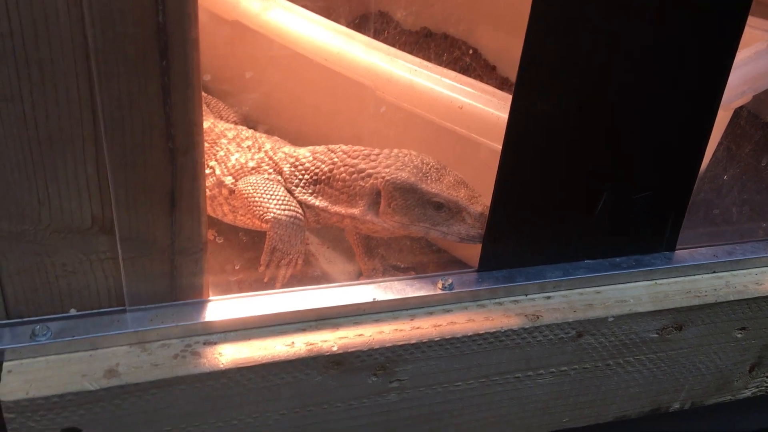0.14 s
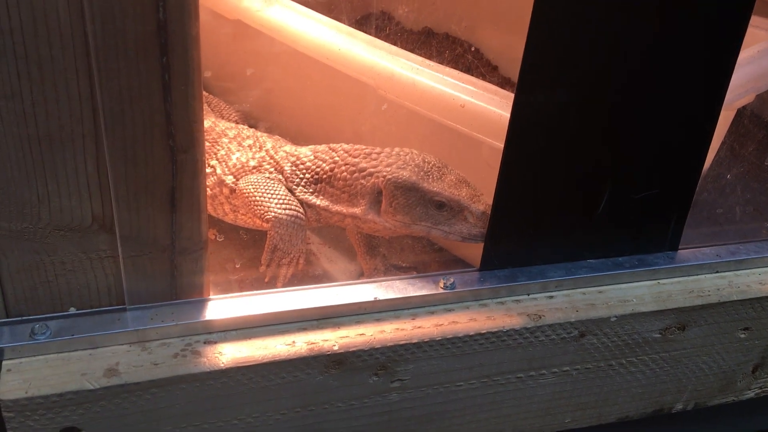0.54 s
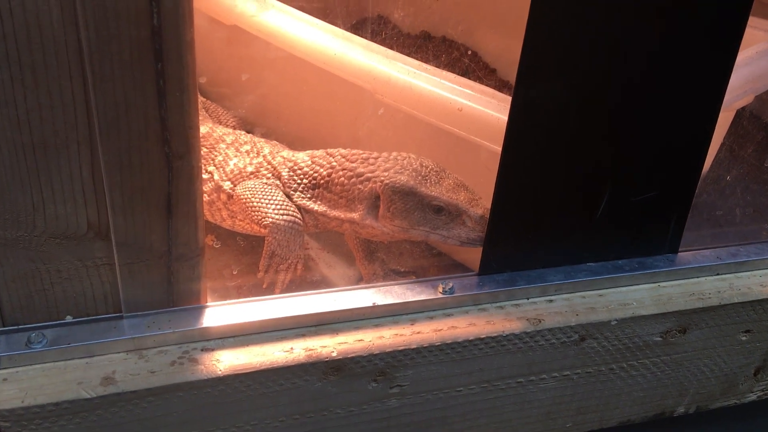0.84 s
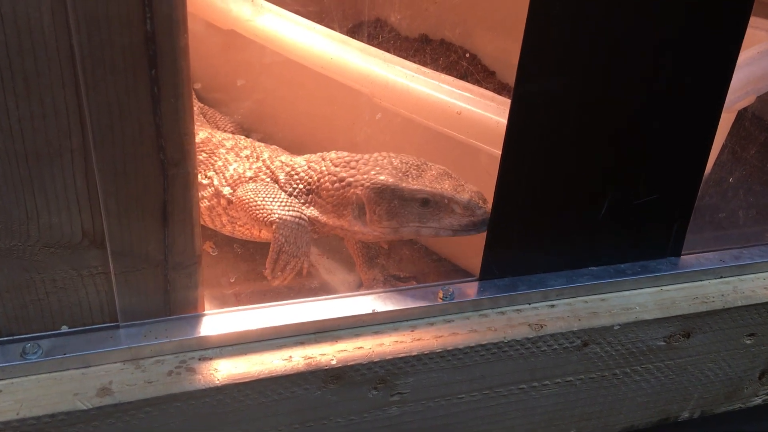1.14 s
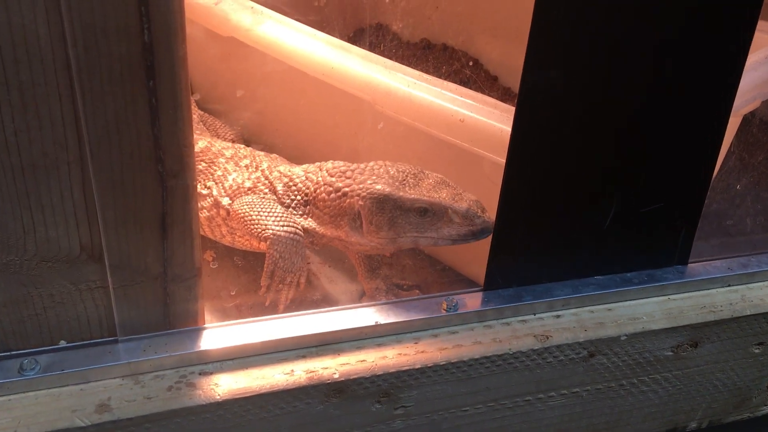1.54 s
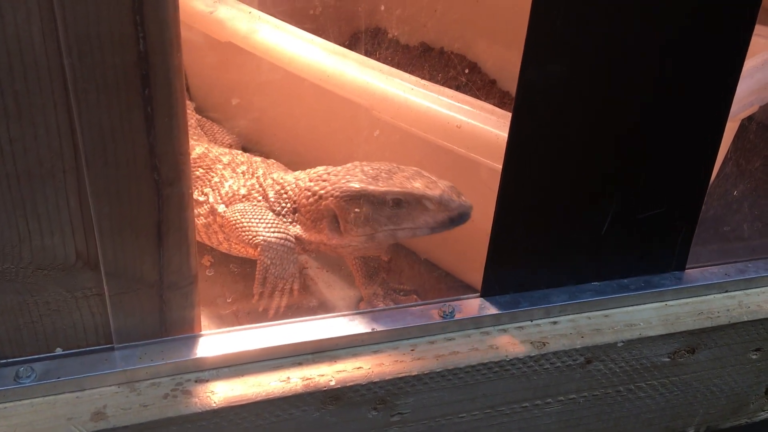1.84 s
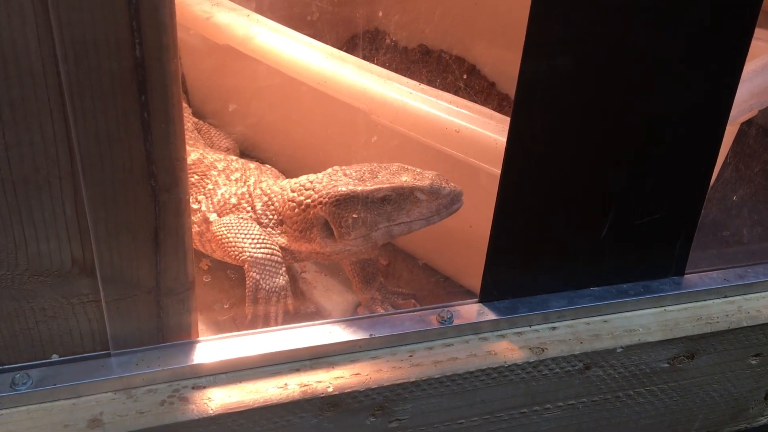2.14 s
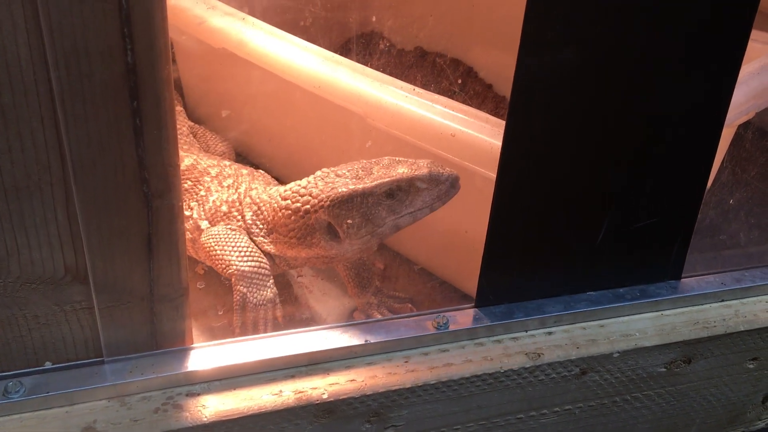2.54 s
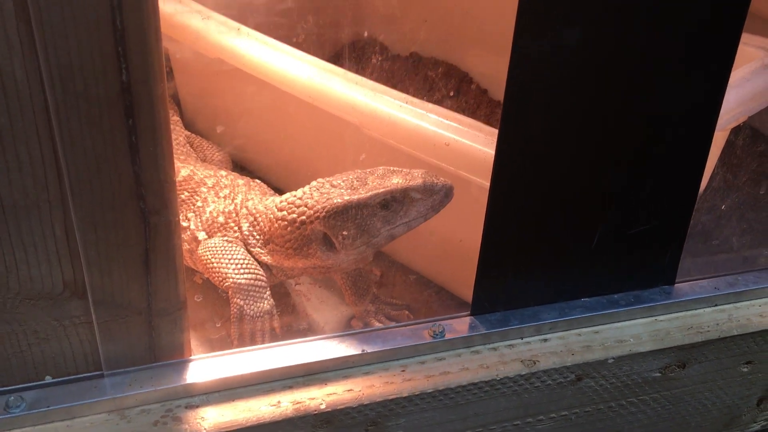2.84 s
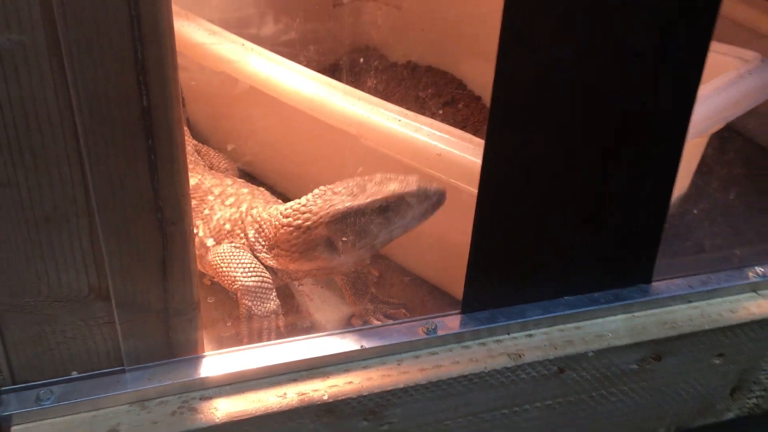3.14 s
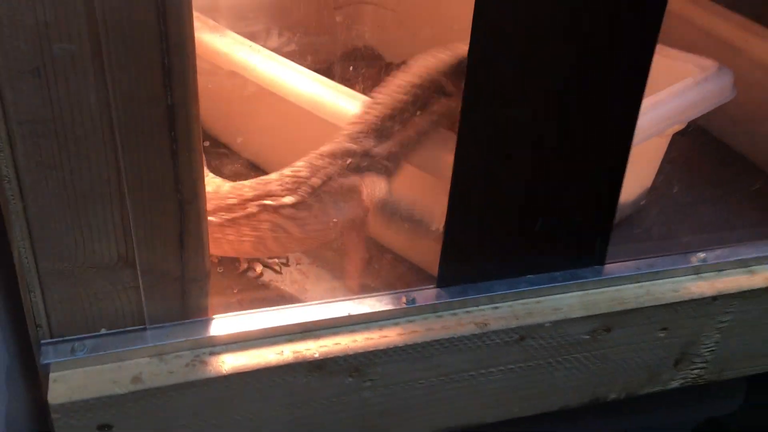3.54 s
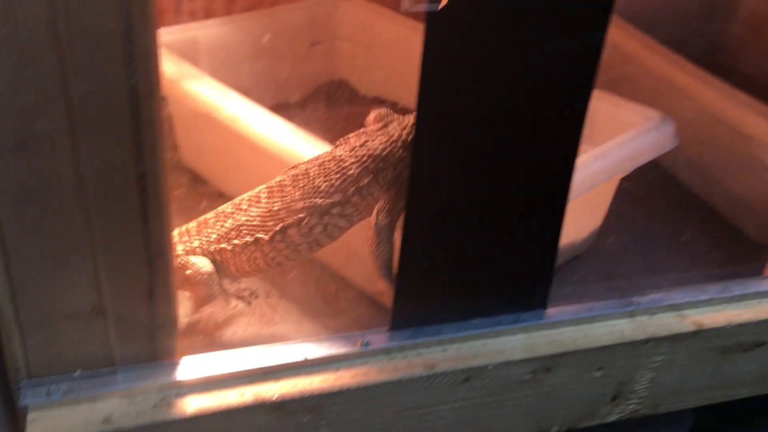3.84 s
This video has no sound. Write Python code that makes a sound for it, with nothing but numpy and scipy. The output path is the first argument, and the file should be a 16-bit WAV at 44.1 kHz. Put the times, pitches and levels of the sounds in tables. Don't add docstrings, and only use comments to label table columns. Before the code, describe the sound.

A gritty sliding scrape of glass in wood, with claw scrabbling and hard tub knocks, after a faint hiss

```python
import sys
import numpy as np
from scipy import signal
from scipy.fft import rfft, irfft
from scipy.io import wavfile
from scipy.ndimage import uniform_filter1d

SR = 44100
rng = np.random.default_rng(int(sys.argv[2]) if len(sys.argv) > 2 else 0)


def transcribe(u):
    v = np.clip(np.atleast_2d(u).T, -1, 1)
    q = np.round(v * 32767).astype(np.int16)
    wavfile.write(sys.argv[1], SR, q)


def how_loud(loudness_db):
    steps = np.asarray(loudness_db, float) / 20
    return 10 ** steps


N = 176400

# (frequency [Hz], density [dB per Hz])
ROOM_LOW = [(30, -11.5), (54, 5.5), (128, -3.5), (282, -13), (393, -11), (557, -21), (895, -16),
            (1200, -40)]
ROOM_HIGH = [(1100, -5), (2000, -12.5), (4300, -16.5), (4950, -21.5), (5500, -7.5), (7500, -20),
             (9500, -22), (15800, -28)]
# (frequency [Hz], level [dB rms])
MOTOR_TONES = [(59.1, -67), (129, -66.5), (177.4, -70.5), (236.6, -72), (473, -80), (708, -85.5),
               (1534, -76), (1593, -87), (1947, -81.5), (2005, -85.5)]
MOTOR_WHINE = [(3892, -93), (4247, -93), (4544, -93), (5776, -92), (6148, -91)]
# (frequency [Hz], width [Hz], level [dB])
AIR_BANDS = [(6150, 430, -1), (6460, 260, 16.5), (6800, 320, -34), (890, 98, 19.5)]

# (start [s], length [s], level [dB], pitch [Hz])
RUSTLES = [
    (0.022, 0.046, -62.5, 2900),
    (0.032, 0.11, -67, 2050),
    (0.331, 0.019, -69.5, 2710),
    (.7, 0.18, -77, 2900),
    (0.432, 0.11, -69, 2730),
    (0.569, 0.076, -72, 2800),
    (1.988, 0.027, -75, 2700),
]

# (time [s], crack level [dB], ring level [dB])
KNOCKS = [(.029, -46, -54), (.0385, -54, -52.5), (1.228, -62, -63), (1.247, -61, -69), (1.601, -57, -62),
          (1.613, -61, -72), (2.119, -57, -43), (3.6065, -25.5, -35.5), (3.63, -36, -36),
          (3.9071, -14.5, -15.5), (3.957, -26.5, -37), (3.9625, -36, -33)]
# (frequency [Hz], level [dB], t60 [s], swell [s])
TUB_MODES = [(1990, -12.5, 0.022, 0.0016), (1452, -8.5, 0.035, 0.0028), (1566, -11, 0.04, 0.0039),
             (1040, -8.5, 0.058, 0.0013), (872, -10.5, .09, 0.0035), (643, -14.5, 0.13, 0.0087),
             (567, 7, 0.027, 0.0039), (443, -10.5, 0.13, 0.005), (286.7, -10.5, 0.14, 0.015),
             (191, -11, 0.11, 0.021), (119.3, -7, 0.13, 0.045)]

# (time [s], level [dB])
BUMPS = [
    (0.032, -66),
    (.039, -53.5),
    (.047, -57.5),
    (0.063, -69),
    (.085, -68),
]
# (frequency [Hz], level [dB], t60 [s])
GLASS_MODES = [(606, -1, 0.11), (1550, -3, 0.062), (2140, -0.5, 0.041), (3180, -2.5, 0.087),
               (3750, -7, 0.058), (5550, -10, .04), (7100, -15, .03)]

# (time [s], peak level [dB], pitch [Hz], wide snap
# level [dB])
TICKS = [(.346, -64, 4500, -7), (.93, -49, 3100, -4), (.96, -57, 8500, -8), (1.228, -53, 6400, -4),
         (1.26, -66, 8500, -3), (2.116, -53, 3580, -6), (2.179, -54, 9500, -8), (3.226, -44, 9000, -2),
         (3.5412, -37, 4700, -16), (3.6062, -27, 3000, -14), (3.608, -30.5, 8500, 2),
         (3.6392, -32, 6950, 1), (3.676, -37, 6300, -14), (3.744, -38, 6500, -8), (3.853, -37.5, 6900, -14),
         (3.901, -35, 3600, -10), (3.907, -31, 4200, -20), (3.9068, -38.5, 8050, -12),
         (3.924, -44, 13000, 0), (3.927, -39.5, 5460, 7.5), (3.931, -37.5, 7000, 3),
         (3.957, -46, 8000, -10), (3.965, -47, 6000, -8)]

# (time [s], level [dB], share of narrow throat [0-1])
HISS = [
    (.68, -80, 0),
    (.76, -70.5, 0),
    (.9, -66, 0),
    (.93, -60.5, 0),
    (.955, -63, 0.2),
    (.984, -57.5, 0.5),
    (1.008, -65, 0),
    (1.022, -77, .3),
]
# (frequency [Hz], density [dB per Hz])
HISS_AIR = [(1500, -1.5), (2500, -1.5), (6300, -5.5), (9200, -8.5), (15800, -17)]
# (frequency [Hz], width [Hz], level [dB])
THROAT = [(2600, 160, -1), (4200, 120, 0), (5670, 150, -3), (8000, 300, -8)]

# (time [s], pressure [dB], fizz level [dB], rumble level [dB])
PUSHES = [
    [(2.116, -53, -6, -7), (2.126, -52.5, -9.5, 7), (2.155, -59.5, -7, 5.5), (2.195, -55, -3, 4.5),
     (2.215, -44, -7.5, -1.5), (2.25, -49.5, -11, -1.5), (2.305, -57, -5.5, 6.5), (2.345, -52, -4, -2.5),
     (2.45, -54, 0.5, -8.5)],
    [(2.45, -56.5, 1.5, -5), (2.55, -44.5, -10.5, -12), (2.62, -41, -9, -14), (2.664, -44, -6.5, -12.5),
     (2.788, -36, -21, -8), (2.87, -41.5, -8, -6), (2.97, -38, -11, -12.5), (3.036, -44.5, -4.5, -3),
     (3.065, -52, 0, -9)],
    [(3.065, -50.5, 2.5, -15), (3.1, -39, -13, -7), (3.15, -38.5, -11.5, -12), (3.178, -40, -8, -12),
     (3.2, -39.5, -15, -2.5), (3.27, -44.5, -11, 1), (3.35, -51, -7.5, 2), (3.4, -54.5, -5.5, 6.5)],
    [(3.4, -52, -5, 3.5), (3.53, -43, -9, 0.5), (3.6, -40.5, -11.5, -5.5), (3.635, -40.5, -1.5, -1),
     (3.68, -39, -11.5, -11.5), (3.75, -44, -6.5, -6.5), (3.85, -40.5, -11.5, -4), (3.93, -49.5, -6, 1.5),
     (4.01, -57.5, -14, 21)],
]
# (frequency [Hz], density [dB per Hz])
SCRAPES = [
    [(400, -7.5), (1000, -10.5), (1700, -6), (2700, -16), (4500, -45)],
    [(400, -6.5), (900, -1.5), (1500, -4.5), (2900, -9.5), (4500, -27)],
]
# (frequency [Hz], width [Hz], level [dB])
PANES = [
    [(732, 19, -10), (985, 64, -1), (1490, 25, 0.5), (1760, 53, -7), (2216, 11, -11), (2520, 32, -3.5),
     (3210, 19, -30), (3210, 85, -13), (3640, 44, -17)],
    [(587, 19, -2.5), (745, 22, 0), (990, 100, 1), (1230, 13, -15), (1436, 50, -2), (1800, 37, 1.5),
     (2500, 65, -7), (3230, 58, -16), (3530, 170, -16)],
    [(430, 19, -8), (660, 83, 3), (1270, 93, 10), (2060, 50, -12), (2760, 70, -6), (3100, 80, -12),
     (3730, 40, -9)],
]
PANE_RING_DB = [-6, -1.5, -3, -5]
# (frequency [Hz], density [dB per Hz])
FIZZ = [(3500, -0.5), (5000, -6), (6200, -1), (7800, -11.5), (9300, -4.5), (10500, -15), (11500, -12),
        (15800, -19)]
RUMBLE = [(30, -46), (64, 6), (102, -11.5), (226, -3.5), (407, -6.5), (600, -13.5)]

# (time [s], level [dB], pitch [Hz], t60 [s])
THUDS = [
    (2.125, -40, 66, .35),
    (2.205, -41, 156, 0.23),
    (2.27, -49, 150, .2),
    (2.52, -49, 85, .4),
    (3.77, -41, 130, 0.27),
    (3.965, -42, 70, .3),
]


def evened(x):
    return x / np.sqrt(np.mean(x ** 2) + 1e-20)


def read(points, hz):
    f, value = np.transpose(points)
    return np.interp(np.log(hz + 1), np.log(f + 1), value)


def colour(x, points):
    hz = np.fft.rfftfreq(len(x), 1 / SR)
    below = np.maximum(np.log2(points[0][0] / (hz + 1)), 0)
    above = np.maximum(np.log2((hz + 1) / points[-1][0]), 0)
    gain = how_loud(read(points, hz) - 24 * (below + above))
    return evened(irfft(rfft(x) * gain, len(x)))


def add(mix, s, sound):
    part = mix[round(s * SR):][:len(sound)]
    part += sound[:len(part)]


def ring(x, peaks):
    total = np.zeros(len(x))
    for hz, width, db in peaks:
        b, a = signal.iirpeak(hz, hz / max(width, 5), SR)
        total += how_loud(db) * signal.lfilter(b, a, x)
    return evened(total)


def drift(per_s):
    knots = rng.standard_normal(int(N / SR * 400) + 2)
    knots = uniform_filter1d(knots, max(int(400 / per_s), 1))
    knots = evened(uniform_filter1d(knots, max(int(200 / per_s), 1)))
    return np.interp(np.arange(N), np.linspace(0, N, len(knots)), knots)


def grit(per_s, spread_db, patchy_db):
    size_db = spread_db * np.minimum(rng.exponential(1, N), 5)
    struck = rng.random(N) < per_s / SR
    z = signal.stft(rng.standard_normal(N) * how_loud(size_db) * struck, nperseg=512)[2]
    patches = uniform_filter1d(rng.standard_normal(z.shape), size=5, axis=0)
    patches = evened(uniform_filter1d(patches, size=8, axis=1))
    return evened(signal.istft(z * how_loud(patchy_db * patches), nperseg=512)[1][:N])


def follow(rows, column):
    rows, t = np.array(rows), np.arange(N) / SR
    fade_s = 0.0042
    inside_s = np.minimum(t - rows[0, 0], rows[-1, 0] - t)
    gate = np.clip(inside_s / (2 * fade_s) + .5, 0, 1)
    return np.interp(t, rows[:, 0], rows[:, column]), np.sqrt(gate)


def sway(x, peaks):
    out = np.zeros(len(x))
    for hz, width, db in peaks:
        bent_hz = hz * (1 + .028 * drift(4.))
        turn = np.exp(2j * np.pi * np.cumsum(bent_hz) / SR)
        r = np.exp(-np.pi * max(width, 40) / SR)
        band = turn * signal.lfilter([1 - r], [1, -r], x / turn)
        out += how_loud(db + 2. * drift(12.0)) * evened(band.real)
    return evened(out)


def room():
    t = np.arange(N) / SR
    low_db = -58.5 + drift(2.9)
    air = how_loud(low_db) * colour(rng.standard_normal(N), ROOM_LOW)
    air += how_loud(-71.5) * colour(grit(20000, .5, 1.), ROOM_HIGH)
    air += how_loud(-80) * ring(rng.standard_normal(N), AIR_BANDS)
    for hz, db in MOTOR_TONES + MOTOR_WHINE:
        waver_db = 3.5 if hz < 300 else 1.
        phase = 2 * np.pi * (hz * t + rng.random()) + 0.046 * drift(2.9)
        air += np.sqrt(2) * how_loud(db + waver_db * drift(22)) * np.sin(phase)
    return air


def rustles():
    out, grains = np.zeros(N), grit(7000, 2., 2.)
    for start, length, db, hz in RUSTLES:
        t = np.arange(0, length, 1 / SR)
        piece = grains[round(start * SR):][:len(t)]
        broad = ring(piece, [(1.4 * hz, 1.8 * hz, 0)])
        brush = ring(broad, [(hz, 350, 0), (1.27 * hz, 500, -1), (2.1 * hz, 2500, -9)])
        swell = np.sin(np.pi * (t / length) ** .6)
        add(out, start, how_loud(db) * swell * brush)
    return out


def knocks():
    out, t = np.zeros(N), np.arange(6000) / SR
    late = t - .001
    crack = np.exp(-.5 * (late / .0005) ** 2) * np.cos(2 * np.pi * 1200 * late)
    blow = np.zeros(len(t))
    for hz, db, t60, swell_s in TUB_MODES:
        swell = np.sin(np.pi / 2 * np.minimum(t / swell_s, 1)) ** 2
        blow += how_loud(db - 60 * t / t60) * np.cos(2 * np.pi * hz * late) * swell
    rattle_db, rattle_t60, rattle_rise_s = -11, 0.17, 0.0032
    rattle_shape = how_loud(rattle_db - 60 * t / rattle_t60) * np.minimum(t / rattle_rise_s, 1)
    for s, crack_db, ring_db in KNOCKS:
        broad = ring(rng.standard_normal(len(t)), [(700, 830, 0)])
        rattle = ring(broad, [(526, 300, 14), (1080, 490, -1)]) * rattle_shape
        add(out, s, how_loud(crack_db) * crack + how_loud(ring_db) * (rattle + blow))
    return out


def bumps():
    out, t = np.zeros(N), np.arange(5000) / SR
    rise = np.minimum(t / .002, 1)
    for s, bump_db in BUMPS:
        for hz, mode_db, t60 in GLASS_MODES:
            db = bump_db + mode_db + 2. * rng.standard_normal()
            add(out, s, how_loud(db - 60 * t / t60) * np.sin(2 * np.pi * hz * t) * rise)
    return out


def claws():
    out, t = np.zeros(N), np.arange(800) / SR
    ping_t60, snap_t60, rise_s = .012, .009, .0004
    for s, db, hz, snap_db in TICKS:
        noise = rng.standard_normal(len(t))
        band = [(hz, .3 * hz, 0)]
        ping = ring(ring(noise, band), band) * how_loud(-60 * t / ping_t60)
        snap = ring(noise[::-1], [(9000, 11000, 0)]) * how_loud(snap_db - 60 * t / snap_t60)
        add(out, s, how_loud(db - 3) * np.minimum(t / rise_s, 1) * (ping + snap))
    return out


def hiss():
    level_db, gate = follow(HISS, column=1)
    narrow = np.clip(follow(HISS, column=2)[0], 0, 1)
    air = grit(12000, 0.8, 1.)
    breath = np.sqrt(1 - narrow) * colour(air, HISS_AIR) + np.sqrt(narrow) * ring(air, THROAT)
    return gate * how_loud(level_db + .7 * drift(47)) * breath


def slide():
    drive = grit(9000, 1.5, 1.2)
    smooth, coarse = [colour(drive, s) for s in SCRAPES]
    crackle = ring(grit(300, 2., 5.), [(3000, 3000, 0), (6500, 3000, -3)])
    coarse = coarse + how_loud(-21) * crackle
    glide, shove, drag = [sway(drive, p) for p in PANES]
    fizz = colour(grit(12000, 0.33, 1.9), FIZZ)
    rumble = colour(grit(2000, 0.44, 0.37), RUMBLE)
    out = np.zeros(N)
    scrapes, panes = [coarse, smooth, smooth, coarse], [glide, glide, shove, drag]
    for rows, scrape, pane, ring_db in zip(PUSHES, scrapes, panes, PANE_RING_DB):
        push_db, gate = follow(rows, column=1)
        fizz_db = follow(rows, column=2)[0]
        rumble_db = follow(rows, column=3)[0]
        share = how_loud(ring_db + .7 * (push_db + 44.5))
        body = (scrape + share * pane) / np.sqrt(1 + share ** 2)
        out += gate * how_loud(push_db) * (body + how_loud(fizz_db) * fizz + how_loud(rumble_db) * rumble)
    return out * how_loud(.6 * drift(30))


def thuds():
    out, t = np.zeros(N), np.arange(12000) / SR
    for s, db, hz, t60 in THUDS:
        rise = np.minimum(t * hz, 1)
        add(out, s, how_loud(db - 60 * t / t60) * np.sin(2 * np.pi * hz * t) * rise)
    return out


def scene():
    mono = room() + rustles() + knocks() + bumps() + claws() + hiss() + slide() + thuds()
    return np.tile(mono, (2, 1))


def roll_off(x):
    return signal.sosfilt(signal.butter(12, 15910, fs=SR, output="sos"), x)


def record(dry):
    bass_cut = signal.butter(2, 30, "high", fs=SR, output="sos")
    x = signal.sosfilt(bass_cut, dry)
    band_limit = signal.firwin(255, 15850, window=("kaiser", 9), fs=SR)
    x = signal.oaconvolve(x, band_limit[None], "same")
    return roll_off(x)


dry = scene()
out = record(dry)
transcribe(out)
```